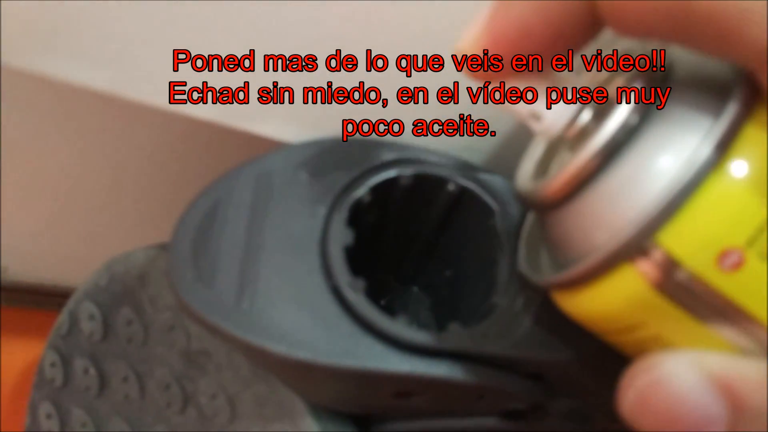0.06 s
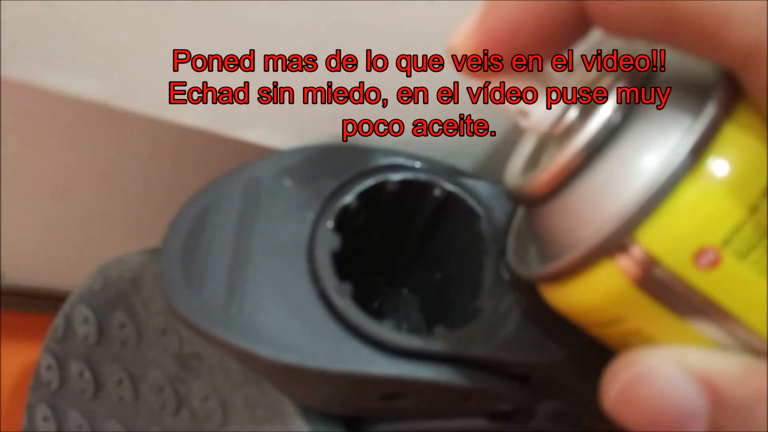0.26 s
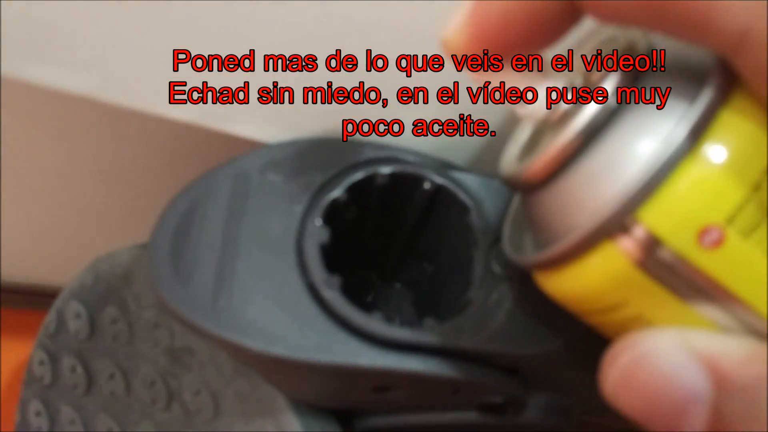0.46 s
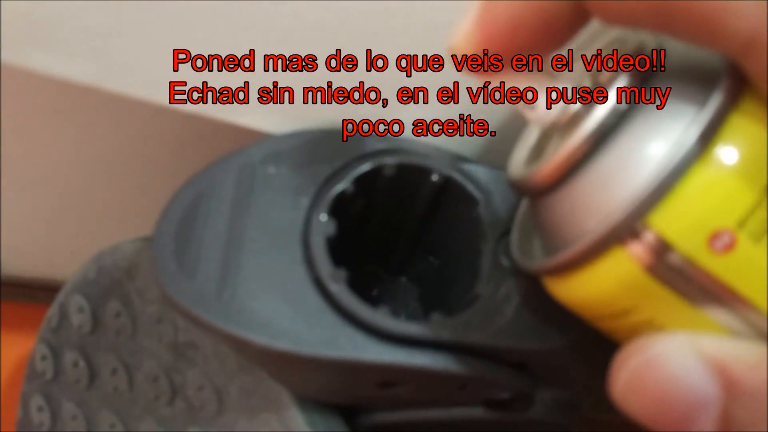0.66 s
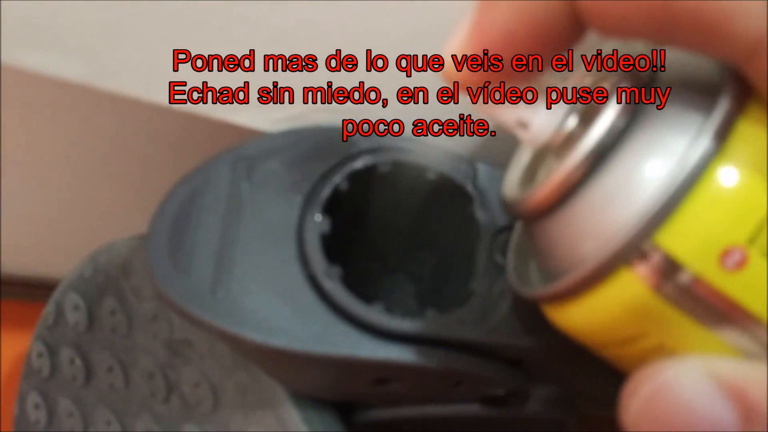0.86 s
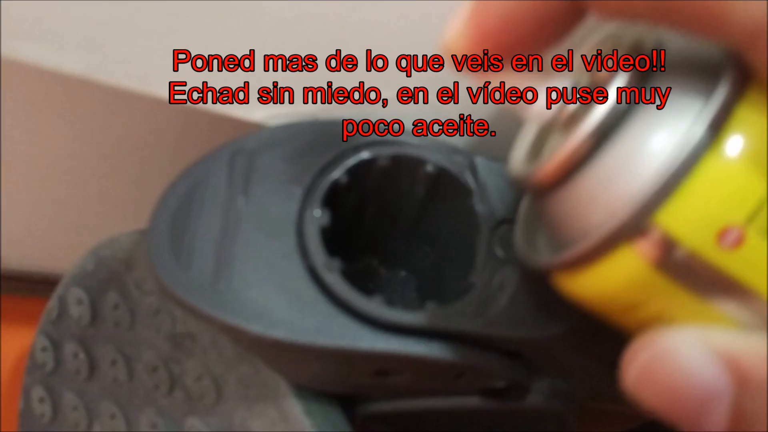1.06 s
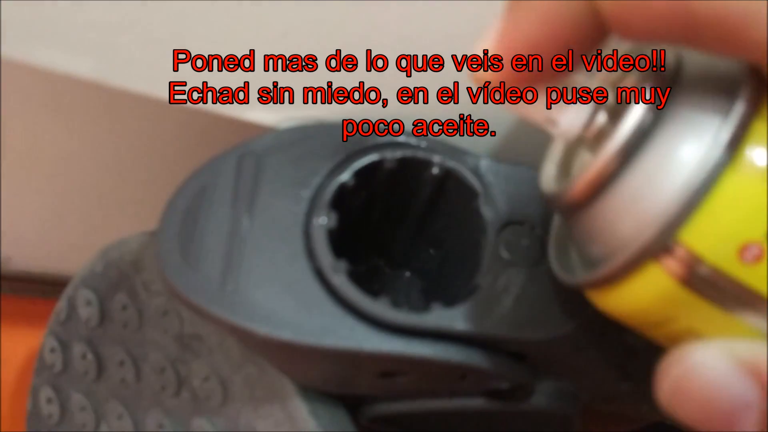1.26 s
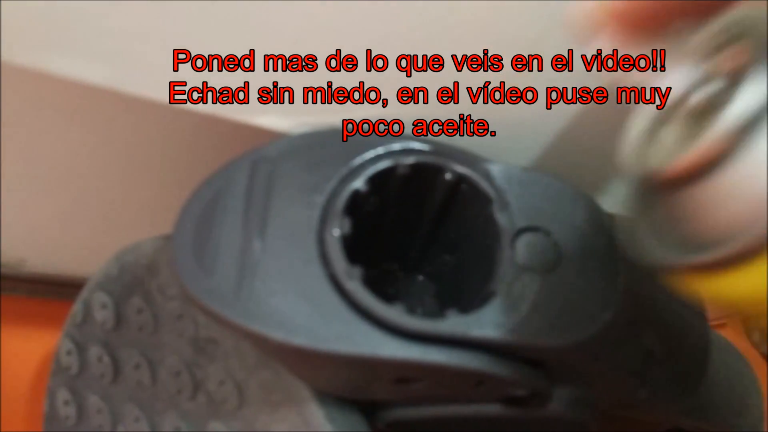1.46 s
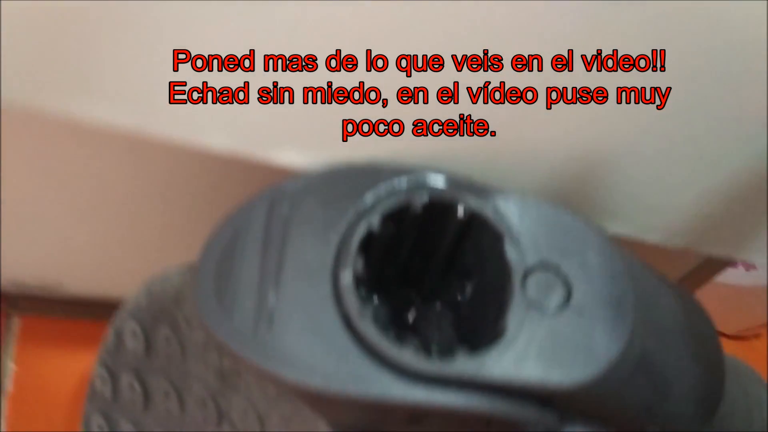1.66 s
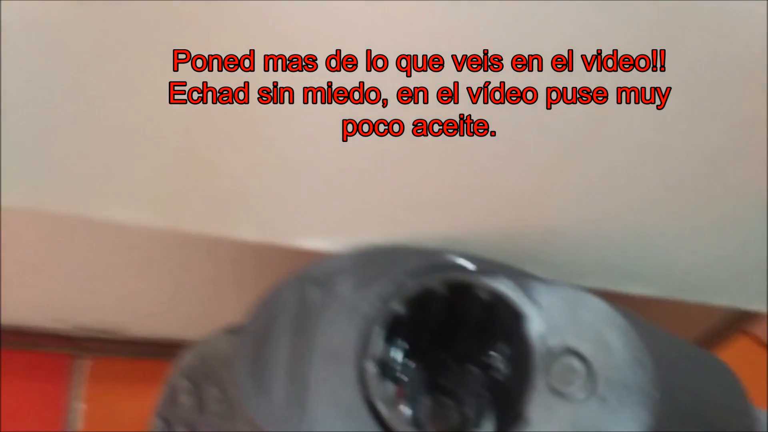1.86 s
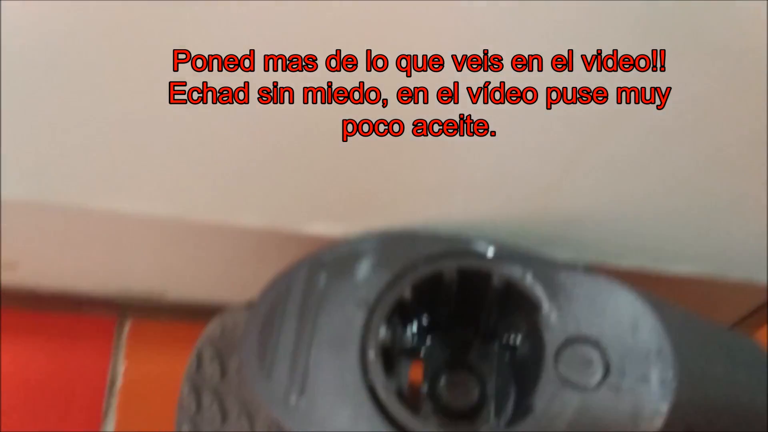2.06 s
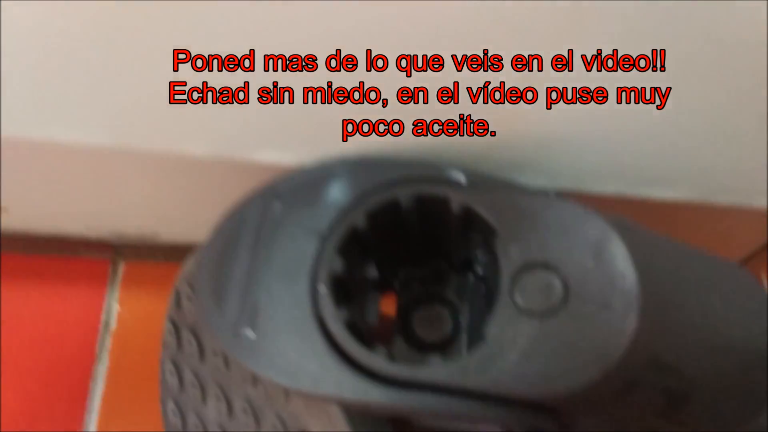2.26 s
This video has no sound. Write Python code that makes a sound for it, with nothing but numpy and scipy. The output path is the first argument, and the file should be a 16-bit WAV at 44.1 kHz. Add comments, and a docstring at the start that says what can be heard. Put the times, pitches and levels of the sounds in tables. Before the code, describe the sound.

An aerosol can sprays a short puff, then a long sputtering hiss, into a hollow part

```python
"""Over a low steady murmur of air, an aerosol can just right of a phone sprays a short puff into a hollow
housing, then a long hiss. The jet is sputtering noise; it comes with the hollow's ring and a low rumble, and
a faint breathy tone swells as the puff dies away. Afterwards the part is turned in the hand: rubs and fizzes
are bursts of noise, bright ticks and then dull knocks are struck modes, all in a small hard room."""
import sys
import numpy as np
from scipy import signal
from scipy.fft import rfft, irfft
from scipy.io import wavfile
from scipy.ndimage import uniform_filter1d

SR = 44100
rng = np.random.default_rng(int(sys.argv[2]) if len(sys.argv) > 2 else 0)


def makeup_ratio(level_db):
    """Linear amplitude ratio for a level in decibels (20 dB per factor of ten)."""
    decades = np.asarray(level_db, float) / 20
    return 10 ** decades


def pcm_store(signal):
    """Save signal as 16-bit PCM."""
    levels = np.round(np.clip(np.atleast_2d(signal), -1, 1) * 32767)
    wavfile.write(sys.argv[1], SR, levels.astype(np.int16).T)


N = 101429

# Spectrum of the murmur. Each row: frequency in Hz, relative level in dB.
AIR_COLOUR = [(35, -101), (60, -39), (222, -3), (281, -9.5), (553, -13), (636, -13), (1110, -13.5),
              (1550, -17.5), (1780, -16), (2650, -21.5), (4120, -28.5), (16000, -30)]
# Correlation of the murmur at the two microphone ports. Each row: frequency in Hz, correlation 0-1.
AIR_CORRELATION = [(130, 1), (290, 0.87), (640, 0.42), (1400, 0.035), (16000, .02)]
# Room resonances in the murmur. Each row: frequency in Hz, width in Hz, boost in dB.
AIR_MODES = [(197, 110, 2), (305, 50, 6), (535, 78, 7.5)]
# Port colour of sound from around. Each row: frequency in Hz, left over right in dB.
PORT_LEAN = [(700, 0), (1200, 0.5), (1800, -5.5), (2600, -5.5), (3700, -0.5), (5200, 7), (7000, 7),
             (9500, 3), (13000, 0.5)]
# Course of the two sprays. Each row: time in seconds, jet control level in dB, then relative to it
# the ring of the hollow in dB, the low rumble in dB, the mid band in dB, the top band in dB.
PUFF = [(.17, -87, -16.5, -30, 0, -2), (.192, -52, -19, -30, 5, -4), (.22, -38, -22, -32, -1.5, -2),
        (.27, -36, -24, -49, -0.5, -4), (.314, -36.5, -22, -44, 0, -3), (.342, -41, -37, -44, 5.5, -2),
        (.362, -46.5, -25, -40, 1, -2), (.39, -61, -22, -28, 3, -3), (.496, -62.5, 2, -26, 10.5, -6)]
HISS = [(.499, -43.5, -22, -25, 0, -2), (.52, -45.5, -32, -28, -3, -2), (.545, -39.5, -17, -40, -1, 5),
        (.62, -36, -39, -30, -4.5, 1), (.70, -32.5, -35, -31, 2, 5), (.82, -31, -26, -25, 3.5, 1.5),
        (.89, -32.5, -16.5, -22.5, 0, 5.5), (.93, -30, -11, -35, 1, 0), (.965, -29.5, -9, -33, 2, 2),
        (.992, -28, -5.5, -23.5, 2.5, 2.5), (1.045, -30, -18, -42, 1.5, 5),
        (1.097, -30, -10, -28.5, 4.5, 5.5), (1.135, -31.5, -19, -44, 7, 6),
        (1.176, -31, -8.5, -36, -0.5, 7), (1.209, -34, -27, -45, 1, 7), (1.238, -39, -37.5, -41, 0.5, 2),
        (1.31, -37.5, -26, -54, 1.5, 1), (1.37, -42.5, -34, -33, -2, 2), (1.386, -49.5, -35, -30, 6, 5),
        (1.43, -80, -27, -30, 3, 6)]
# Colour of the jet at each port. Each row: frequency in Hz, relative level in dB.
JET_LEFT = [(200, -42), (500, -25), (850, -22), (1150, -15.5), (1600, -19.5), (2200, -15.5), (2950, -17.5),
            (3250, -20), (3550, -26), (3850, -17), (4150, -13), (4500, -20), (4750, -14), (5200, -7),
            (5900, -10), (6500, -6), (7500, -6.5), (8600, -7.5), (9500, -11.5), (10500, -12), (11250, -25),
            (11800, -13.5), (12700, -13), (14200, -8.5), (15500, -9)]
JET_RIGHT = [(200, -41), (500, -24), (850, -13.5), (1550, -14), (2000, -6.5), (2650, -7.5), (2950, -10),
             (3250, -19.5), (3550, -17), (3850, -16), (4150, -13), (4500, -20), (4750, -19), (5050, -19),
             (5800, -16), (6600, -22), (7500, -15), (8700, -13), (9400, -13), (10300, -11.5),
             (11200, -10.5), (12200, -4), (12800, -4.5), (13700, -14.5), (14600, -8.5), (15550, -2)]
# How the ports hear the jet. Each row: frequency in Hz, phase lead of the left in radians, shared power 0-1.
JET_PORTS = [(201, 2.4, 0.95), (850, 0.34, 0.8), (1180, -0.5, 0.73), (1550, -3, .55), (2040, 0, 0.75),
             (2750, 0.5, 0.44), (3000, 0.2, 0.4), (3600, 1.5, .1), (3800, 3.14, .4), (3920, 3.14, 1),
             (4480, 3.14, 1), (4640, 6, .4), (5350, 5.5, 0.18), (6470, 7, 0), (9400, 6.5, 0.02),
             (10400, 6, 0.3), (11400, 7, 0.3), (12600, 3.5, 0.04), (13600, 1, 0), (14700, 6.5, 0.2)]
# Loss of sharing in the mid band as the can tilts. Each row: time in seconds, unshared power 0-1.
TILT = [(.85, 0.03), (1.0, 0.53), (1.2, 0.36), (1.3, 0.26)]
# Resonances of the hollow. Each row: frequency in Hz, width in Hz, relative level in dB.
HOLLOW_MODES = [(1580, 60, 0), (1830, 50, -12), (2150, 90, -17)]
# Faint tone. One row: start in seconds, end in seconds, frequency in Hz, width in Hz, level in dB.
FAINT_TONE = (.34, .48, 665, 30, -65)
# Rubs of fingers on the part, and a faint brief tick at 1.885 s. Each row: start in seconds, level before port
# colour in dB, hold in seconds, fade time constant in seconds.
RUBS = [(1.42, -69, .35, 0.22), (1.885, -59, .002, .003), (1.965, -58.5, 0.0081, 0.044),
        (2.139, -52, 0.0033, 0.0058), (2.15, -59, .01, 0.032), (2.21, -63, .03, 0.045)]
# Spectrum of the rubs. Each row: frequency in Hz, relative level in dB.
RUB_COLOUR = [(300, -5), (1400, 6.5), (3000, -1.5), (5500, -8), (8000, -18), (16000, -42)]
# Bright metal ticks. Each row: start in seconds, peak of the ring in dB, left over right in dB,
# length of the scrape in seconds.
TICKS = [(1.549, -40.5, 12.5, 0.00012), (1.554, -41, 12, 0.000026)]
# Modes of the ticks. Each row: frequency in Hz, mean relative level in dB, 60 dB decay in seconds.
TICK_MODES = [(2440, -7, 0.015), (3350, -10, 0.013), (4180, -8, 0.014), (4630, -9, 0.016),
              (4900, -4, 0.033), (5720, -1, .014), (6040, 4.5, 0.018), (6960, 3, 0.02), (7600, 0, 0.023),
              (7900, -6, .014), (10000, -3, 0.01)]
# Brief bright fizzes as the part is handled. Each row: start in seconds,
# level before port colour in dB, hold in seconds, fade time constant in seconds.
FIZZES = [(1.554, -57, .004, 0.02), (1.59, -65, 0.022, 0.13), (1.958, -62, 0.0043, 0.0026),
          (2.003, -55, 0.006, 0.007), (2.1395, -59, .002, .003), (2.286, -61.5, 0.0071, 0.0049)]
# Spectrum of the fizzes. Each row: frequency in Hz, relative level in dB.
FIZZ_COLOUR = [(1000, -9), (3000, -1.5), (6000, -2), (7200, 2), (10000, -2.5), (13000, -5), (16000, -5.5)]
# Dull knocks of the housing. Each row: start in seconds, peak of the ring in dB, left over right in dB,
# length of the contact in seconds.
KNOCKS = [(1.958, -35, -7.5, 0.000063), (1.9636, -44, -3, 0.000086), (2.197, -40, -7, .00022)]
# Modes of the housing. Each row: frequency in Hz, mean relative level in dB, 60 dB decay in seconds.
KNOCK_MODES = [(848, -14.5, 0.03), (970, -4, 0.028), (1160, -4.5, 0.018), (1336, -7, 0.02),
               (1444, -1, 0.022), (1650, -3, 0.016), (1790, -7, 0.016), (2270, -9, 0.013),
               (2760, -8.5, 0.016), (3450, -14, 0.01), (4540, -13, 0.011)]


def read(table, col=1):
    """A spectrum interpolates smoothly over log frequency; here one column at every FFT bin."""
    rows = np.array(table, float)
    bins_hz = np.maximum(np.arange(N // 2 + 1) * SR / N, 1)
    return np.interp(np.log(bins_hz), np.log(rows[:, 0]), rows[:, col])


def unit(x):
    """Root-mean-square normalisation: dividing by the rms leaves an rms of 1."""
    return x / np.sqrt(np.mean(x ** 2))


def shape(x, gain):
    """Linear filtering: the spectrum is multiplied by a gain per FFT bin."""
    return irfft(rfft(x, N) * gain, N)


def peak(hz, width_hz):
    """Second-order resonance: unit gain at its frequency, half power across its width."""
    f = np.maximum(np.arange(N // 2 + 1) * SR / N, 1)
    return 1 / (1 + 1j * (f - hz ** 2 / f) / width_hz)


def walk(rate_hz):
    """Slow random modulation: random values drawn at a rate, joined by slopes, with rms near 1."""
    hold = max(int(SR / rate_hz), 2)
    steps = np.repeat(rng.standard_normal(N // hold + 1), hold)
    return unit(uniform_filter1d(steps, hold)[:N])


def pan(x, db, lead=0.):
    """Stereo placement: two channels differ in level and phase."""
    left = shape(x, np.exp(.5j * lead)) * makeup_ratio(db / 2)
    right = shape(x, np.exp(-.5j * lead)) * makeup_ratio(-db / 2)
    return np.array([left, right])


def leaned(x):
    """Port colour: a level difference between channels that depends on frequency."""
    side = np.array([[1], [-1]])
    return shape(x, makeup_ratio(read(PORT_LEAN) * side / 2))


def air():
    """Partly coherent noise field: sum and difference parts set the correlation of the ports."""
    mid, side = rng.standard_normal((2, N)) * makeup_ratio(1.0 * walk(9.71))
    alike = np.clip(read(AIR_CORRELATION), 0, 1)
    boost = sum((makeup_ratio(db) - 1) * np.abs(peak(hz, w)) ** 2 for hz, w, db in AIR_MODES)
    colour = makeup_ratio(read(AIR_COLOUR)) * (1 + boost)
    mid = shape(mid, colour * np.sqrt(1 + alike))
    side = shape(side, colour * np.sqrt(1 - alike))
    return makeup_ratio(-61.5) * np.array([mid + side, mid - side]) / np.sqrt(np.mean(mid ** 2))


def control(col, shut=0):
    """Flow through a valve: one column of both sprays over time, with a fixed value outside them."""
    rows = np.array(list(PUFF) + list(HISS))
    return np.interp(np.arange(N) / SR, rows[:, 0], rows[:, col], left=shut, right=shut)


def jet():
    """Turbulent jet noise: sputtering noise, partly shared by the ports, and a wholly unshared pair."""
    shared, *own = rng.standard_normal((5, N)) * makeup_ratio(1.0 * walk(900))  # sputter in dB, rate in Hz
    lead, share = read(JET_PORTS), np.clip(read(JET_PORTS, col=2), 0, 1)
    colour = makeup_ratio(np.array([read(JET_LEFT), read(JET_RIGHT)]))
    side = np.array([[1], [-1]])
    common = shape(shared, colour * np.sqrt(share) * np.exp(.5j * side * lead))
    ports = common + shape(np.array(own[:2]), colour * np.sqrt(1 - share))
    apart = shape(np.array(own[2:]), colour)
    return unit(ports), unit(apart)


def hollow_ring():
    """Cavity resonance: noise through the modes of the hollow, surging in level."""
    modes = sum(makeup_ratio(db) * peak(hz, w) for hz, w, db in HOLLOW_MODES)
    ring = unit(shape(rng.standard_normal(N), modes))
    return pan(ring * makeup_ratio(control(2) + 2.5 * walk(13.7)), -8.5, -1.8)  # dB, radians


def rumble():
    """Low-frequency flow noise: a broad resonance, applied twice, selects a band of noise."""
    return unit(shape(rng.standard_normal(N), peak(430, 280) ** 2)) * makeup_ratio(control(3))


def patchy(ports, apart):
    """Band-wise modulation: narrow bands wander in level, mid and top bands follow their own course."""
    wander_db, own_wander_db, wander_hz = 1.1, 1.0, 8.05  # slow unevenness as can and part shift
    f, out = np.arange(N // 2 + 1) * SR / N, 0
    edges = np.r_[0, np.arange(800, 16400, 600), SR]
    spectrum, loose = rfft(ports), rfft(apart)
    tilt = np.clip(np.interp(np.arange(N) / SR, *np.array(TILT).T), 0, 1)
    for lo, hi in zip(edges[:-1], edges[1:]):
        inside = (f >= lo) & (f < hi)
        is_mid, is_top = 3200 <= lo < 5000, lo >= 14000
        band = irfft(spectrum * inside, N)
        if is_mid:
            band = band * np.sqrt(1 - tilt) + irfft(loose * inside, N) * np.sqrt(tilt)
        wander = wander_db * walk(wander_hz)
        own = np.array([walk(wander_hz), walk(wander_hz)])  # one for each port
        wander = wander + own_wander_db * (not is_mid) * own
        out = out + band * makeup_ratio(control(4) * is_mid + control(5) * is_top + wander)
    return out


def spray():
    """Common flow: one flickering level drives the jet, the ring and the rumble together."""
    flow = makeup_ratio(control(1, shut=-120) + 0.74 * walk(24.8))  # flicker in dB, rate in Hz
    ports, apart = jet()
    resonances = hollow_ring() + rumble()
    return flow * makeup_ratio(3.5) * (makeup_ratio(3) * patchy(ports, apart) + resonances)


def faint_tone():
    """Narrowband noise: a sharp resonance makes a breathy tone, which swells and fades."""
    start, end, hz, width_hz, db = FAINT_TONE
    progress = np.clip((np.arange(N) / SR - start) / (end - start), 0, 1)
    swell = np.sin(np.pi * progress) ** .5
    return makeup_ratio(db) * swell * unit(shape(rng.standard_normal(N), peak(hz, width_hz) ** 2))


def bursts(rows, colour):
    """Gated noise: grainy noise of one colour starts sharply, holds and decays exponentially."""
    t = np.arange(N) / SR
    gate = sum(makeup_ratio(db) * (t > start) * np.exp(-np.maximum(t - start - hold, 0) / fade)
               for start, db, hold, fade in rows)
    grainy = [noise * makeup_ratio(3.1 * walk(700)) for noise in rng.standard_normal((2, N))]
    return gate * np.array([unit(shape(x, makeup_ratio(read(colour)))) for x in grainy])


def rubs():
    """Sliding friction: fingers on the part give bursts of dull grainy noise, among them one faint brief tick."""
    return leaned(bursts(RUBS, RUB_COLOUR))


def strike(modes, at_s, db, pan_db, scrape_s, crack_db):
    """Modal excitation: a short rough push rings damped modes, and a crack of noise marks the contact."""
    onset_s, crack_s = 0.00058, 0.0021
    t = np.arange(int(.15 * SR)) / SR
    ring = sum(makeup_ratio(level + 1.7 * rng.standard_normal() - 60 * t / t60)
               * np.sin(2 * np.pi * (hz * t + rng.random())) for hz, level, t60 in modes)
    ring = ring * (1 - np.exp(-t / onset_s))
    roughness = 1 + 30 * np.sqrt(scrape_s) * rng.standard_normal(len(t))
    push = roughness * np.exp(-(t / scrape_s) ** 2)
    hit = signal.fftconvolve(ring, push)[:len(t)]
    crack = makeup_ratio(crack_db) * rng.standard_normal(len(t)) * np.exp(-t / crack_s)
    out, i = np.zeros(N + len(t)), int(at_s * SR)
    out[i:i + len(t)] = (hit / np.abs(hit).max() + crack) * makeup_ratio(db)
    return out[:N] * makeup_ratio(np.array([[pan_db], [-pan_db]]) / 2)


def ticks():
    """Ringing metal: brief scrapes excite bright, quickly damped modes."""
    return sum(strike(TICK_MODES, *row, crack_db=-12) for row in TICKS)


def fizzes():
    """Gated broadband noise: brief bursts of bright grainy noise as the part is handled."""
    return leaned(bursts(FIZZES, FIZZ_COLOUR))


def knocks():
    """Impact on a shell: short contacts excite the low, damped modes of the housing."""
    return sum(strike(KNOCK_MODES, *row, crack_db=-16) for row in KNOCKS)


def handling():
    """Superposition of contacts as the can is put down and the part is turned."""
    return knocks() + ticks() + rubs() + fizzes()


def room(x):
    """Reverberation: near surfaces and a duller room tail decay as noise, independent at each port."""
    near_db, near_t60_s = -20, .03
    far_db, far_t60_s, dull_hz = -15.5, 0.45, 8500
    t = np.arange(int(.6 * SR)) / SR
    near, far = rng.standard_normal((2, 2, len(t)))
    near = near * makeup_ratio(-60 * t / near_t60_s) * (t > .0006)
    far = signal.lfilter(*signal.butter(1, dull_hz, fs=SR), far)
    far = far * makeup_ratio(-60 * t / far_t60_s) * (t > .004)
    tail = sum(makeup_ratio(db) * h / np.sqrt(np.sum(h ** 2, axis=1, keepdims=True))
               for db, h in ((near_db, near), (far_db, far)))
    return x + signal.fftconvolve(x, tail, axes=1)[:, :N]


def scene():
    """Linear superposition: spray and handling reverberate, the tone and the murmur are added."""
    return room(spray() + handling()) + faint_tone() + leaned(air())


def roll_off(x):
    """The treble ends steeply here."""
    return signal.sosfilt(signal.butter(12, 16950, fs=SR, output="sos"), x)


def record(dry):
    """Band limiting: the phone cuts the deep bass and the extreme treble."""
    bass_cut = signal.butter(4, 170, "high", fs=SR, output="sos")
    treble_cut = signal.ellip(14, .3, 80, 15720, fs=SR, output="sos")
    mix = signal.sosfilt(treble_cut, signal.sosfilt(bass_cut, dry))
    return roll_off(mix)


dry = scene()
out = record(dry)
pcm_store(out)
```